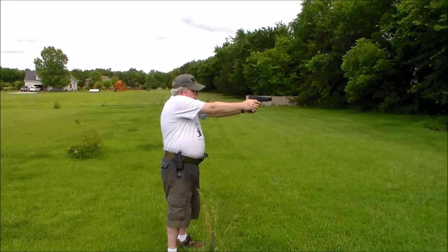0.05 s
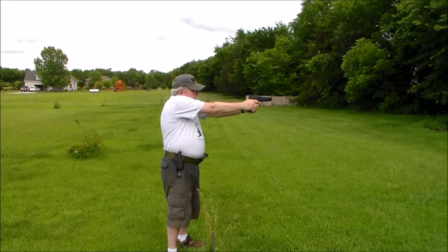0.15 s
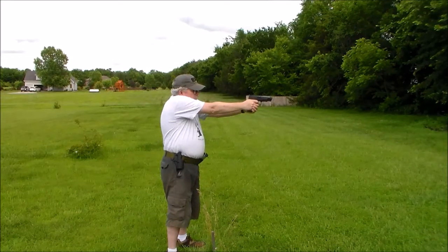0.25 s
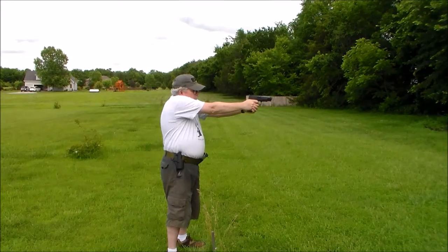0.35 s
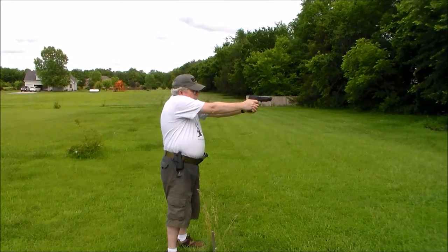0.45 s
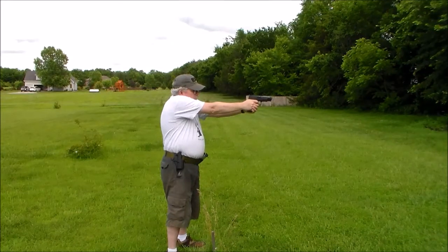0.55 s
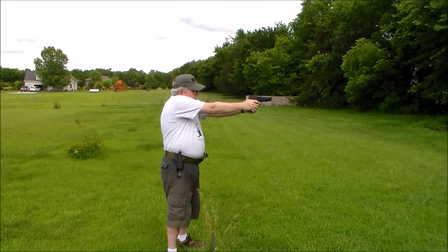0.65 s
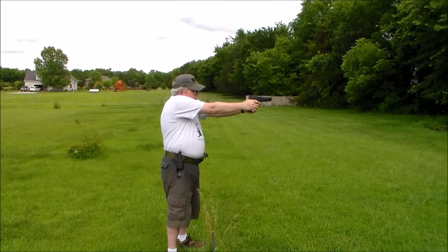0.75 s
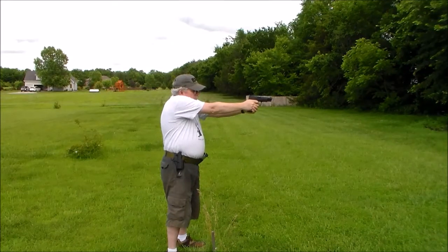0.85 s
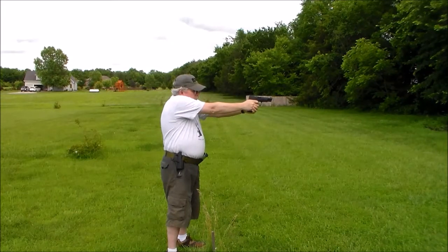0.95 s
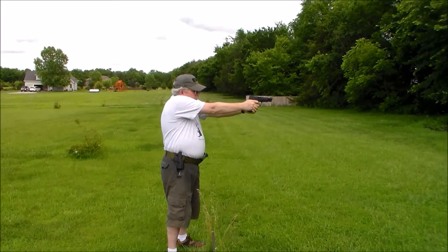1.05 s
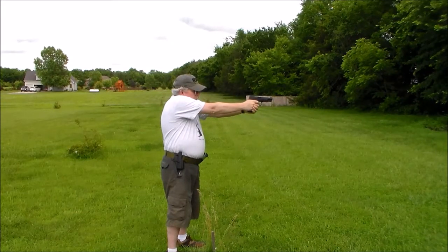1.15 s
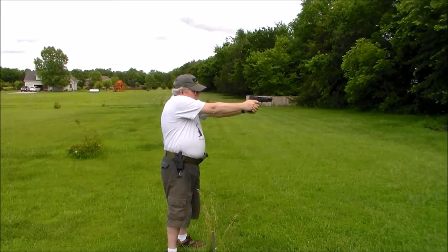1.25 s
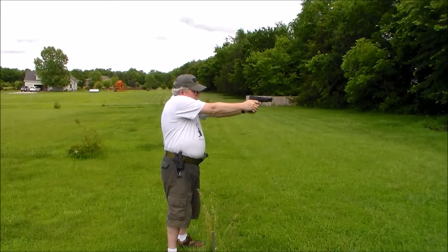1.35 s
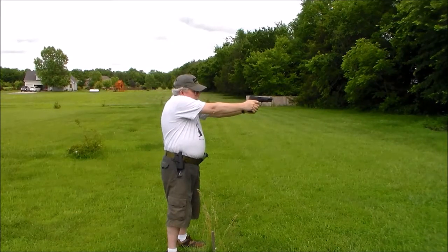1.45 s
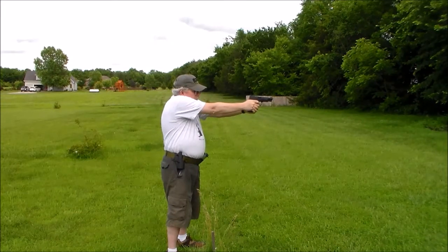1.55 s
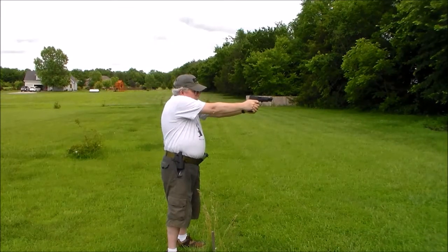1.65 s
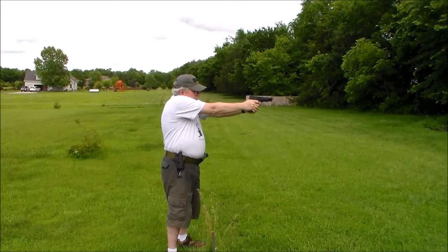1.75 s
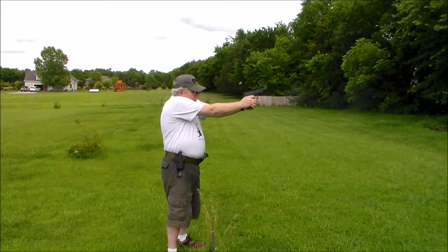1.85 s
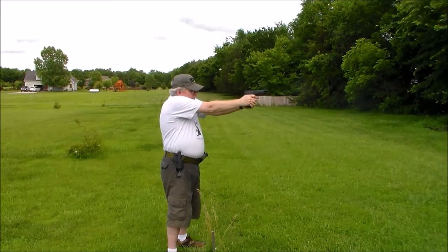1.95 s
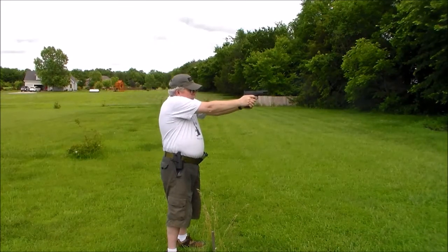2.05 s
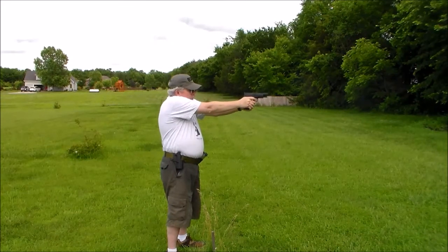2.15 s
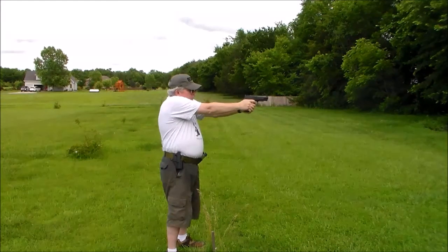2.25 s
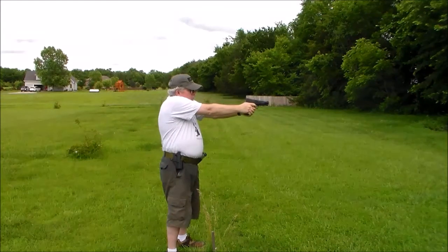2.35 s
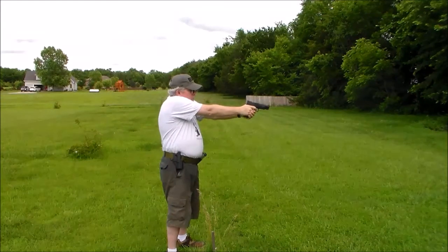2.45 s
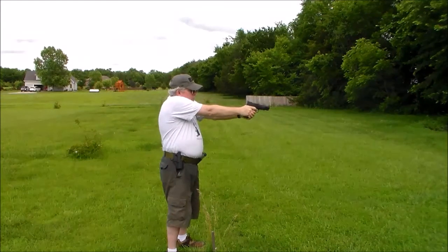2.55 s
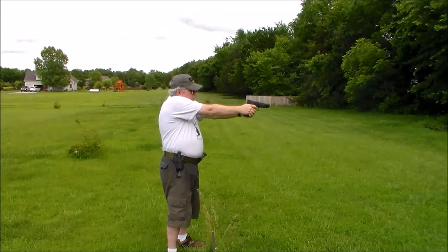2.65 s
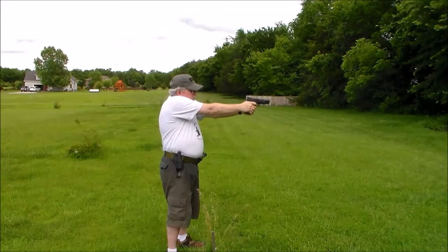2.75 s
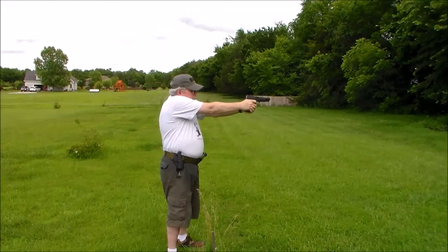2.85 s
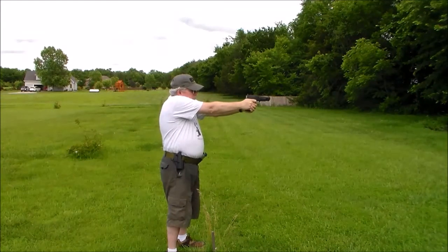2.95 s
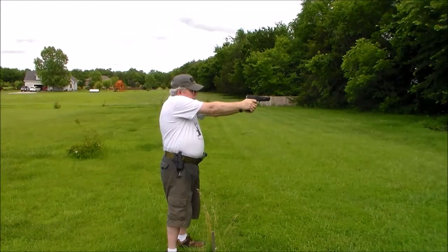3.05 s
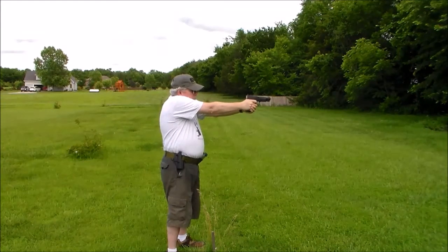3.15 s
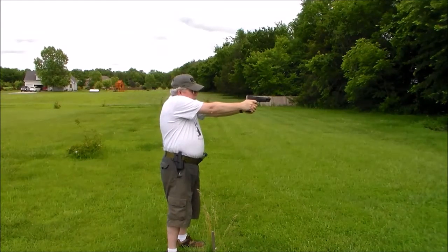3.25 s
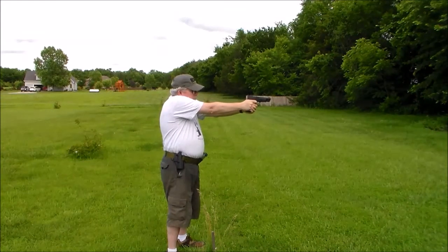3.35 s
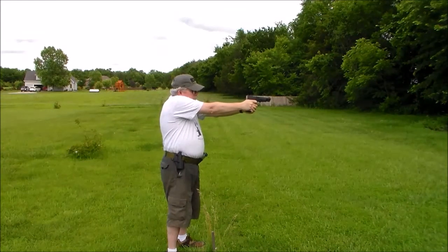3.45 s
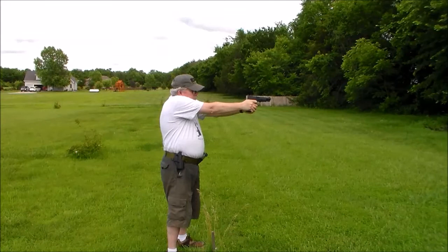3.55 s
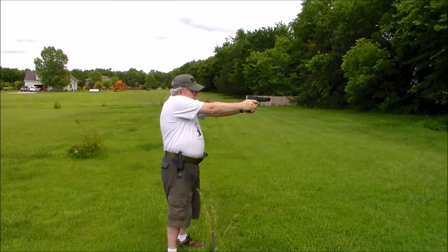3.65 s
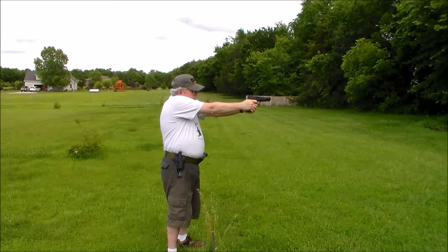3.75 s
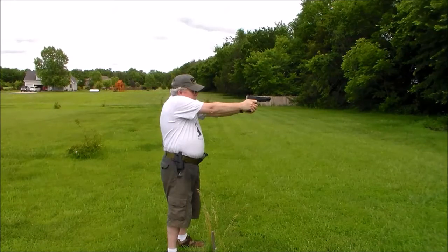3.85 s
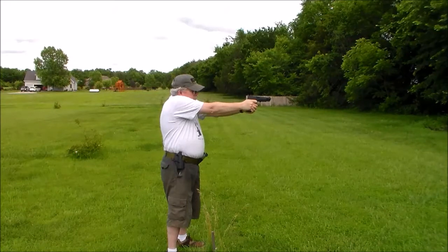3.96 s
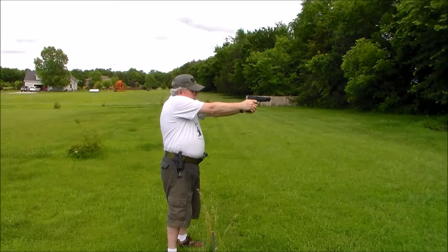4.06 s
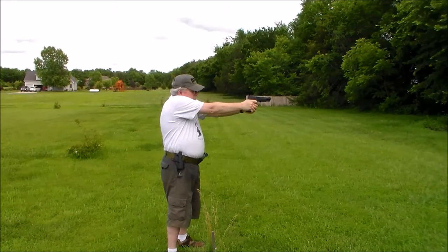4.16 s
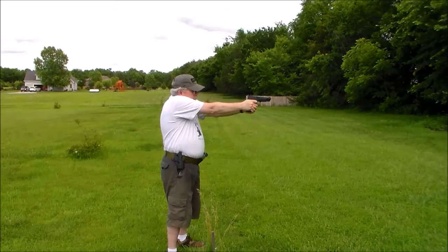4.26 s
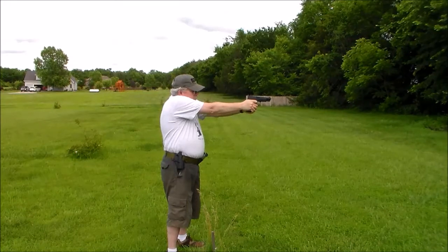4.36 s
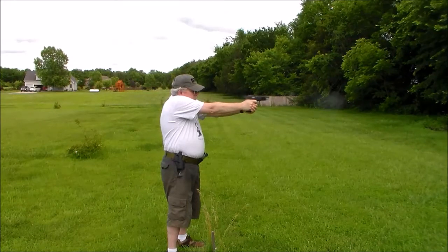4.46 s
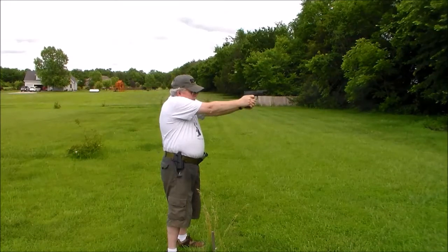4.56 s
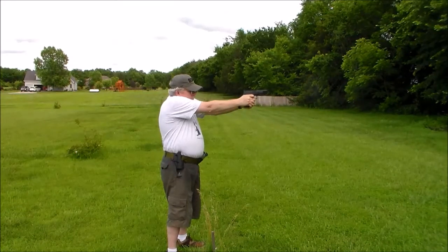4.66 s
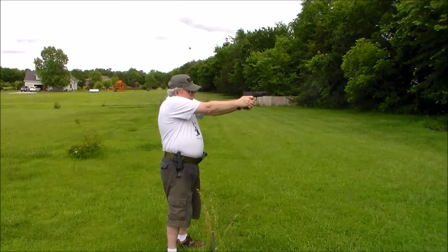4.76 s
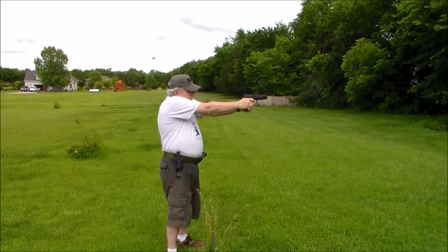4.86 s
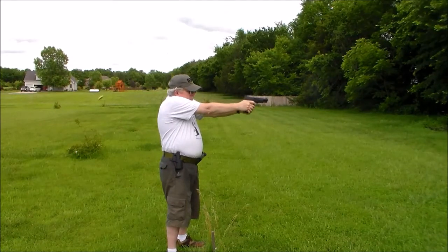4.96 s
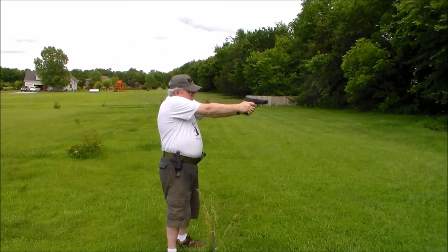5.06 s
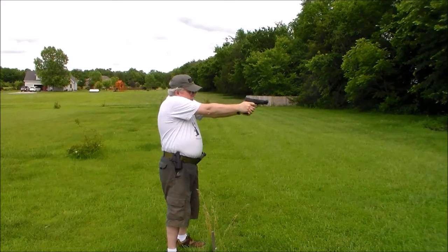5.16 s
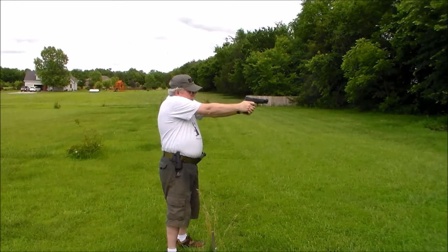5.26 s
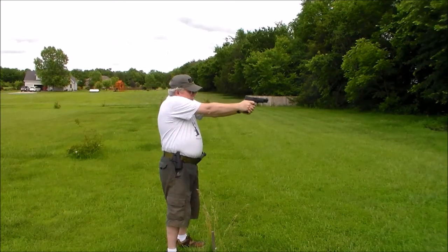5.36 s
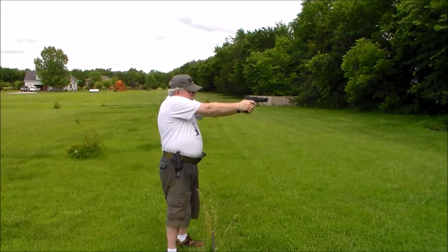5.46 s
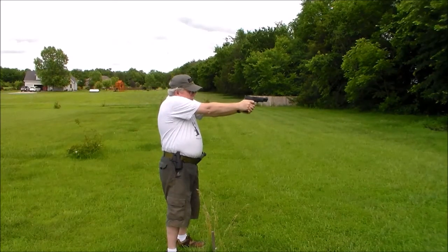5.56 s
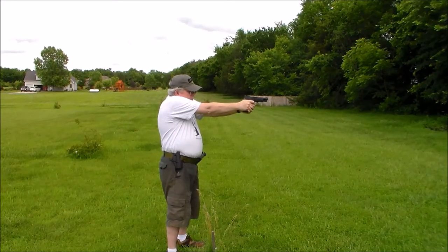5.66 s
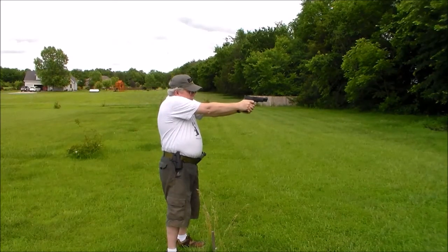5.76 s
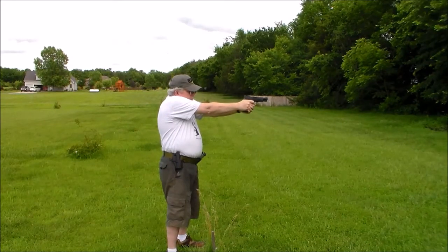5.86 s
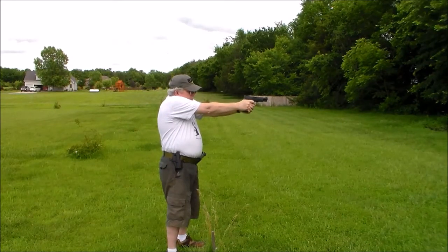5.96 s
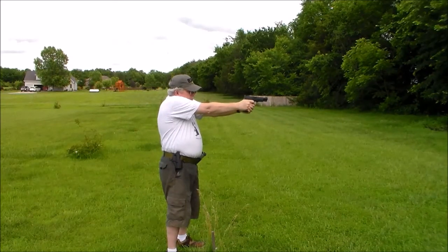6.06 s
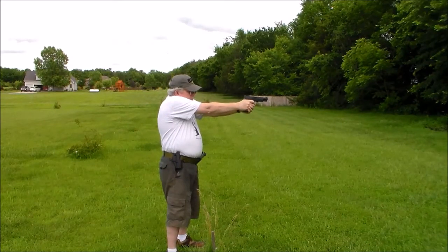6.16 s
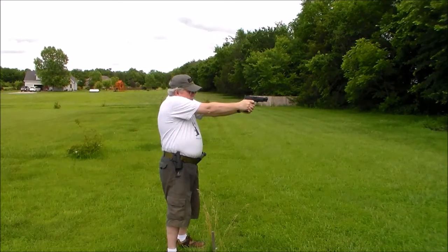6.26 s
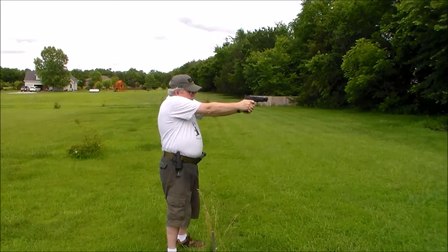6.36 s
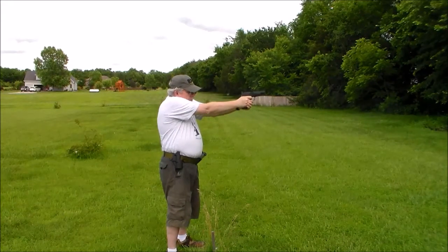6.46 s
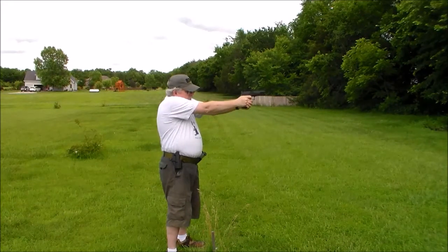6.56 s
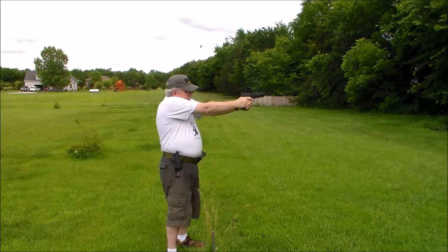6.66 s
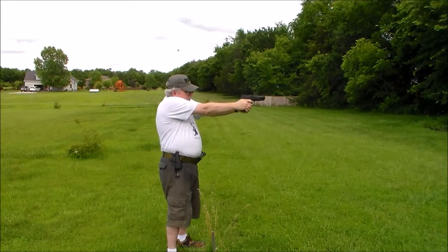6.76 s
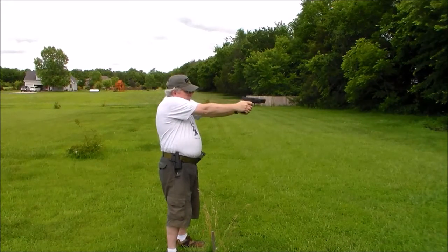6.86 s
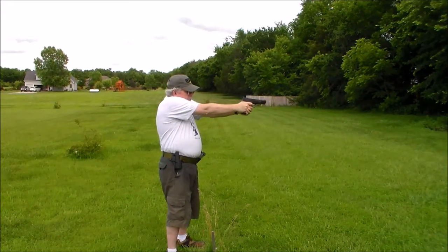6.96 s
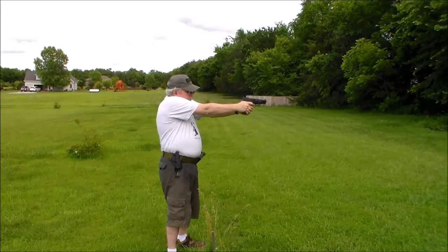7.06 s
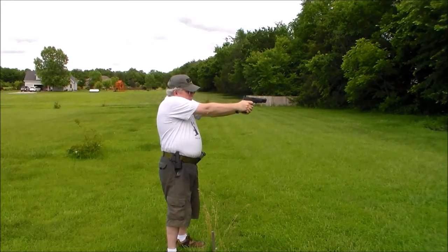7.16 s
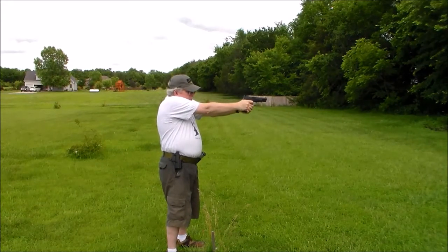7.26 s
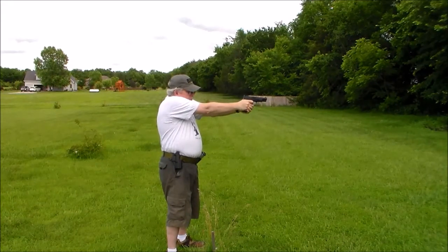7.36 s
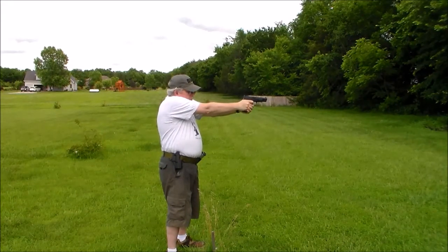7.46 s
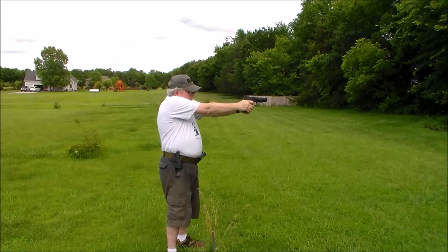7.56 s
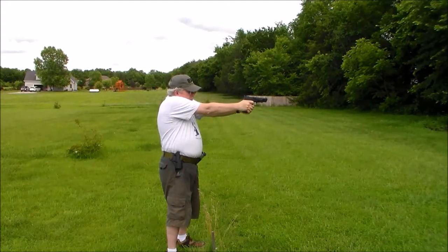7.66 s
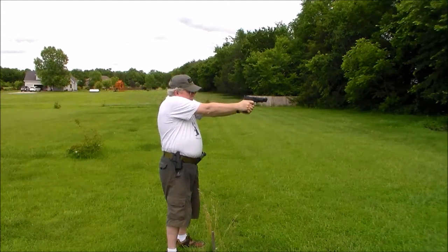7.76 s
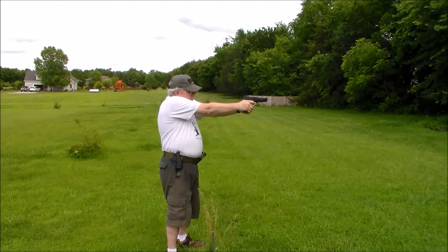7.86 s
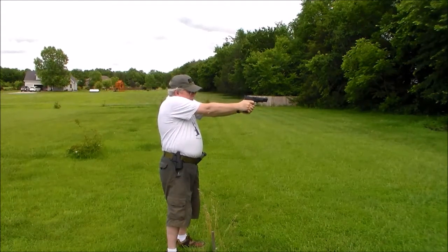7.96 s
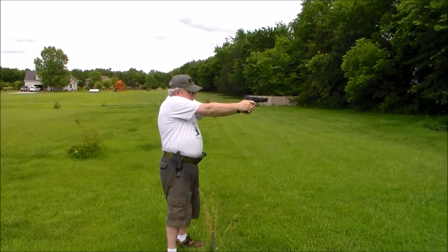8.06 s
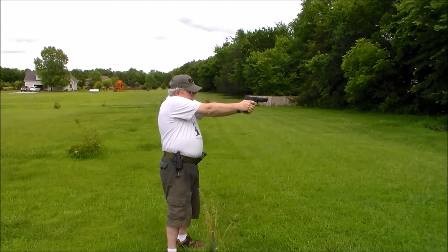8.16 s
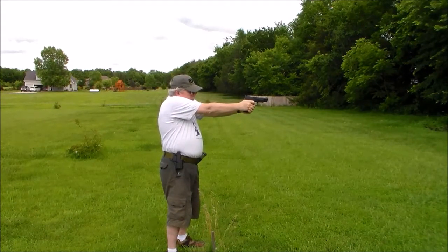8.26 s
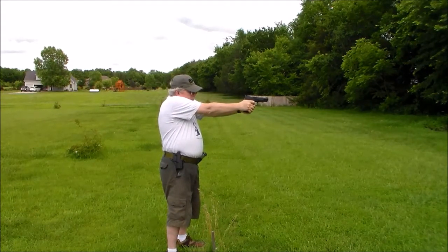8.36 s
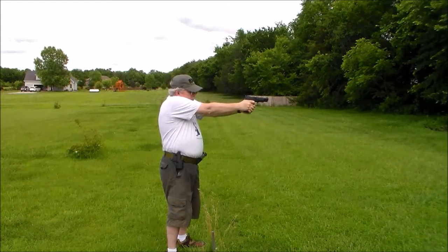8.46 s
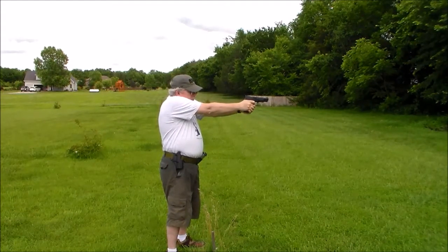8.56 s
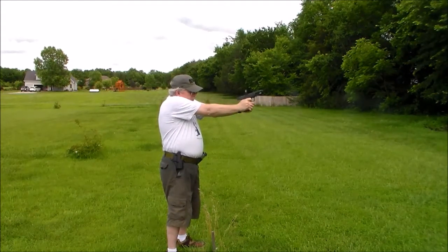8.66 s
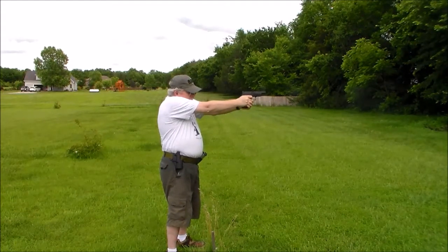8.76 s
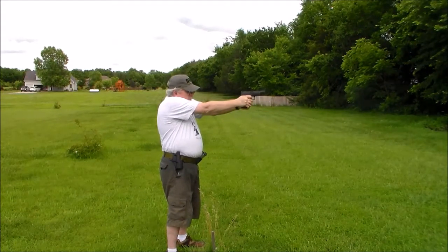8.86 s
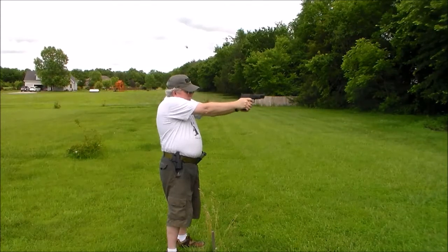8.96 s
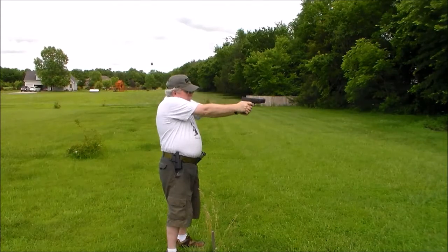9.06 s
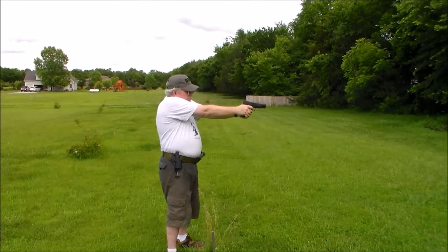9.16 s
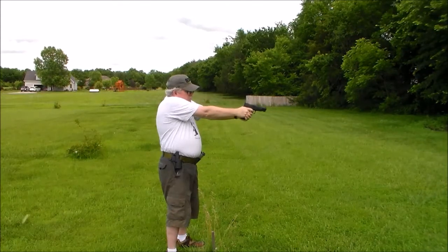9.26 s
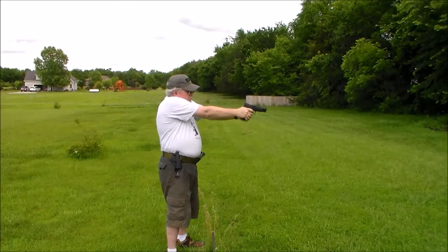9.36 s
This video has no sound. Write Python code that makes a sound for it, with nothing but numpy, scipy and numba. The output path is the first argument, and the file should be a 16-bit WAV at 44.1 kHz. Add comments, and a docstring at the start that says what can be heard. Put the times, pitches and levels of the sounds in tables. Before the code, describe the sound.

Four slow pistol shots crack close by in an open field, each with clattering echoes and a roll, while insects buzz and fall quieter.

```python
"""An insect chorus fills an open field over murmuring air and a far motor: shaped noise and wandering sines.
Four pistol shots break in a few metres away; blast and ground bounce are noise jolts that overload the microphone.
Grass and trees scatter noise, a near wall and far buildings return N-waves, and a long roll of noise fades.
The gain control ducks everything, holds for most of a second, then lets the field swell back."""
import sys
import numpy as np
from scipy import signal
from scipy.fft import rfft, irfft
from scipy.io import wavfile
from scipy.ndimage import uniform_filter1d
from numba import njit

SR = 44100
rng = np.random.default_rng(int(sys.argv[2]) if len(sys.argv) > 2 else 0)


def file_out(sig):
    """Save sig as 16-bit WAV at sys.argv[1]."""
    # one column per channel
    cols = np.atleast_2d(sig).T
    # limit, then scale
    lim = np.clip(cols, -1, 1)
    pcm = np.round(lim * 32767).astype(np.int16)
    wavfile.write(sys.argv[1], SR, pcm)


N = 414540
TOP_HZ = 15500  # upper edge of the sound chain

# The shots, with the bias steps they force on the capsule: start_s, blast_left, blast_right,
# wall_left, wall_right [all four in full scale], roll_db [gain of the long roll],
# carry_db [shifts each echo's level by its own share, up or down]
SHOTS = [(1.9262, -1.5, -1.23, -0.15, -0.22, 2.5, 0.5), (4.599, -1.5, -1.84, -0.19, -0.48, -0.07, 9),
         (6.5273, -2.2, -2.24, -0.15, -.3, -0.5, -5.5), (8.779, -1.43, -0.94, 0.49, -0.07, 0.8, 1.5)]


def undb(db):
    """Turn decibels into an amplitude factor."""
    return 10 ** (np.asarray(db) / 20)


def level(x, db):
    """Scale a sound to an RMS level in dB, both channels together."""
    return x * undb(db) / np.sqrt(np.mean(x ** 2))


def band(x, hz, width):
    """Two-pole resonance, gain 1 at the centre."""
    return signal.lfilter(*signal.iirpeak(hz, hz / width, SR), x)


def steep(x, hz, width):
    """The resonance twice, for dark flanks."""
    return band(band(x, hz, width), hz, width)


def low_pass(x, hz):
    """Third-order roll-off of the treble."""
    return signal.sosfilt(signal.butter(3, hz, fs=SR, output="sos"), x)


def pair(count, alike):
    """Left and right noise with the given likeness, from mid and side."""
    mid, side = rng.standard_normal((2, count))
    alike = np.clip(alike, 0, 1)
    opposite = np.array([[1], [-1]])
    return np.sqrt((1 + alike) / 2) * mid + np.sqrt((1 - alike) / 2) * side * opposite


def colour(x, points):
    """Shape the spectrum of noise by (Hz, dB) points, joined along log frequency."""
    hz, db = np.transpose(points)
    count = x.shape[1]
    bins_hz = np.maximum(np.arange(count // 2 + 1) * SR / count, 1)
    curve_db = np.interp(np.log(bins_hz), np.log(hz), db, -90, -90)
    return irfft(rfft(x) * undb(curve_db), count)


def walk(rate, count):
    """Random levels held 1 / rate s and slewed twice; spread near 1."""
    k = int(SR / rate)
    held = np.repeat(rng.standard_normal(count // k + 1), k)
    return 1.5 * uniform_filter1d(uniform_filter1d(held, k), k)[:count]


def add(out, s, sound):
    """Mix a sound in at a time."""
    i = int(s * SR)
    if i < N:
        out[:, i:i + sound.shape[1]] += sound[:, :N - i]


def lag(x, samples):
    """Delay the left port by a fraction of a sample, as a phase turn."""
    turn = np.exp(-2j * np.pi * np.arange(N // 2 + 1) * samples / N)
    return np.array([irfft(rfft(x[0]) * turn, N), x[1]])


def chorus():
    """Insect level in dB: each shot hushes it part of the way to its quietest, then it slowly picks up."""
    start_db, hushed_db, hush_share = -24.5, -41, 0.5
    hush_s, recover_s = 0.88, 12.1  # time constants
    db = np.full(N, start_db)
    for s, *_ in SHOTS:
        since = np.maximum(np.arange(N) / SR - s, 0)
        drop = hush_share * (db[int(s * SR)] - hushed_db)
        db = db - drop * (1 - np.exp(-since / hush_s)) * np.exp(-since / recover_s)
    return db


def insects(chorus_db):
    """Many insects rasp as flickering noise in a broad treble band, a little to the right."""
    # Spectrum of the chorus: pitch_hz, relative_db [per Hz]
    chorus_spectrum = [(1290, -39), (2200, -39), (2750, -26.5), (3370, -14.5), (4180, -7), (4710, -9),
                       (5910, -1.5), (6340, -3.5), (7420, -19.5), (8000, -23), (10400, -33), (17600, -120)]
    rasp = undb(.9 * walk(9, N) + .9 * walk(120, N))
    lean_db = np.array([[-1.4], [1.4]])
    return level(colour(pair(N, 0.8), chorus_spectrum) * rasp, 0) * undb(chorus_db + lean_db)


def air():
    """The low murmur in the air: dark noise that wavers, rises slightly, then slowly sinks."""
    # Spectrum of the murmur: pitch_hz, relative_db [per Hz]
    murmur_spectrum = [(12, -27.5), (20, -2), (75, -13.5), (108, -6), (150, -7.5), (276, -19), (317, -21),
                       (493, -31.5), (524, -23.5), (679, -27), (1030, -27.5), (1170, -30), (1450, -26.5),
                       (2400, -24), (3120, -66.5), (5280, -120)]
    # Slow level of the murmur: time_s, gain_db
    murmur_level = [(0, 2.5), (3.7, 3.5), (5.2, -2.5), (6.599, -5), (9.4, -6)]
    murmur = level(colour(pair(N, 0.92), murmur_spectrum), -45)
    slow_db = np.interp(np.arange(N) / SR, *np.transpose(murmur_level))
    return murmur * undb(1.2 * walk(6.9, N) + slow_db)


def hiss(chorus_db):
    """High hiss that rises and sinks with the insects, a little further than they do."""
    # Spectrum of the high hiss: pitch_hz, relative_db [per Hz]
    hiss_spectrum = [(4410, -47.5), (7500, -23), (8910, 7.5), (9990, 1.5), (12200, 9.5), (13300, 1),
                     (14300, -14)]
    noise = level(colour(pair(N, 0.17), hiss_spectrum), -52)
    return noise * undb(1.2 * (chorus_db - chorus_db[0]))


def motor():
    """A far motor hums in steady partials of wandering pitch and level; the close pair beats."""
    # Partials of the motor: pitch_hz, wander_hz, level_db [RMS, before the gain control]
    partials = [(53.6, 1.5, -55), (100.4, .6, -52), (107, .6, -48.5), (137.3, 1.3, -55),
                (160.7, 2.3, -55.5), (215, 3.5, -58), (315, 4, -66), (1003, 5.4, -66.5), (1480, 8, -65)]
    hum = np.zeros(N)
    for hz, wander_hz, db in partials:
        phase = 2 * np.pi * np.cumsum(hz + wander_hz * walk(6, N)) / SR
        hum += level(np.sin(phase) * undb(1.7 * walk(2.8, N)), db)
    return hum


def field():
    """Insects and a high hiss stand over the murmuring air and a far motor."""
    chorus_db = chorus()
    return insects(chorus_db) + air() + hiss(chorus_db) + motor()


def burst(length_ms, db, hz, width):
    """A ragged pressure jolt that rings the microphone housing."""
    jolt = pair(600, 0.82) * (np.arange(600) < length_ms * SR / 1000)
    ring = band(jolt, hz, width)
    return ring * undb(db) / np.max(np.abs(ring))


def grass():
    """Treble scattered right after the blast, each band dying at its own pace."""
    # Bands of the scattered treble: pitch_hz, level_db [RMS before its decay], t60_s
    blades = [(4380, 3.5, 0.2), (7450, -1.5, 0.52), (10900, -7, 0.29)]
    t = np.arange(SR) / SR
    noise = pair(SR, .7) * (t > .004)
    return sum(level(steep(noise, hz, hz), db) * undb(-60 * t / t60) for hz, db, t60 in blades)


def trees(scatter):
    """Many small reflectors: grass fades at once, then the tree line answers, sags and dies band by band."""
    # Bands of the return: pitch_hz, relative_db, t60_s [after the sag]
    foliage = [(121, -2.5, 0.33), (250, 1.5, 0.46), (530, 12.5, 0.22), (820, 11.5, 0.6), (1385, 10.5, 0.21),
               (2380, 6.5, 0.32), (2980, 1, 0.54), (4700, -14, 0.24)]
    grass_s, grass_db, grass_t60_s = .004, 1.5, 0.14
    trees_s, rise_s, trees_db = 0.044, .01, -3
    sag_db_per_s, sag_end_s = 90, 0.12  # the sag ends here, then each band dies
    t = np.arange(scatter.shape[1]) / SR
    late = np.maximum(t - sag_end_s, 0)
    bands = np.zeros_like(scatter)
    for hz, db, t60 in foliage:
        bands += level(steep(scatter, hz, 1.37 * hz), db) * undb(-60 * late / t60)
    bands = low_pass(bands, 5670)
    near = (t > grass_s) * undb(grass_db - 60 * (t - grass_s) / grass_t60_s)
    rise = np.clip((t - trees_s) / rise_s, 0, 1)
    line = rise * undb(trees_db - sag_db_per_s * (t - late - trees_s))
    return bands * np.hypot(near, line)


def echo(db, hz, width, air_hz):
    """The N-shaped blast wave sent back by one surface, smeared by its roughness."""
    t = np.arange(900) / SR
    n_wave = (1 - 2 * t * hz) * (t < 1 / hz)
    smear = .55 * pair(len(t), .6) * np.exp(-t / .0024)
    ring = low_pass(steep(n_wave + smear, hz, width), air_hz)
    return -ring * undb(db) / np.max(np.abs(ring))


def echoes(carry_db):
    """Single reflectors, the wall first; the air takes more treble from the later ones."""
    # Reflectors: delay_s [after the shot], pitch_hz, width_hz, peak_db [at a carry of 0 dB],
    # carry_share [dB of shift per dB of the shot's carry; negative turns it around]
    reflectors = [(0.0517, 2220, 750, 34.5, -0.49), (0.051, 4680, 5860, 23.5, 0),
                  (.061, 3050, 2470, 13.5, 0), (0.072, 3060, 2960, 22.5, -0.51),
                  (0.0792, 2320, 2400, 22.5, 0.029), (.09, 1204, 2490, 26, 0.04),
                  (.12, 1400, 2500, 14, -0.19), (.129, 2480, 3500, -3, 0.35),
                  (0.541, 2530, 2000, -24, 0.071), (.645, 2600, 1500, -13, .1),
                  (.697, 2800, 1400, -12, .95), (0.7029, 2840, 920, -6.5, 0.95),
                  (0.7938, 2220, 3850, 1.5, 0.31), (0.8502, 2030, 2800, -0.5, 0.0019),
                  (.875, 1900, 1500, -5.5, .2), (.883, 3200, 3000, -15, -0.61),
                  (0.912, 2180, 2400, -20, -.3), (0.929, 2050, 1800, -24, 0.027),
                  (.937, 1980, 1500, -13, -.3), (1.583, 2300, 1800, -41, 1.3),
                  (1.62, 2040, 1300, -26, -0.37), (1.64, 2270, 1500, -25.5, -0.24),
                  (1.815, 1800, 1200, -33, -.1)]
    edge_hz, edge_at_s, edge_slope = 9500, .1, .27  # treble edge at that delay, sinking as a power of it
    returns = np.zeros((2, 2 * SR))
    for delay, hz, width, db, share in reflectors:
        air_hz = min(edge_hz * (edge_at_s / delay) ** edge_slope, TOP_HZ)
        add(returns, delay, echo(db + share * carry_db, hz, width, air_hz))
    return returns


def roll():
    """Long roll: dull rumble and a thinner bright wash, a few washes from far fields."""
    # Washes: delay_s [after the shot], dull_db, bright_db [both before the shot's roll gain], t60_s
    washes = [(0.098, 6.5, 4.5, 0.42), (0.101, -15.5, -23, 2.19), (0.099, -37, -62, 14.6),
              (0.662, -36, -27, 1.31), (.745, -26, -30.5, .3), (.86, -45, -30, 0.78),
              (1.5, -51.5, -45, 3.3)]
    rise_s = 0.024
    count = int(3.5 * SR)
    s, dull_db, bright_db, t60 = np.transpose(washes)[:, :, None]
    since = np.maximum(np.arange(count) / SR - s, 0)
    wash = np.minimum(since / rise_s, 1) * undb(-60 * since / t60)
    dull = level(steep(pair(count, 0.93), 721, 720), 0) * undb(1.3 * walk(25, count))
    bright = level(steep(pair(count, .8), 2100, 2400), 0) * undb(2.5 * walk(150, count))
    # the washes add up in power
    dull_gain = np.linalg.norm(wash * undb(dull_db), axis=0)
    bright_gain = np.linalg.norm(wash * undb(bright_db), axis=0)
    return dull * dull_gain + bright * bright_gain


def shots():
    """Each shot meets the same reflectors, but the air stirs the fine pattern."""
    # Blast and its ground bounce: delay_s [after the shot], length_ms, peak_db, pitch_hz, width_hz
    jolts = [(0, 1.3, 45, 3380, 2990), (.0026, 1.8, 46, 3200, 2920)]
    out = np.zeros((2, N))
    trunks = undb(3 * walk(450, SR))  # spiky pattern shared by all shots
    same = pair(SR, 0.9)
    for s, *_, roll_db, carry_db in SHOTS:
        for delay, *jolt in jolts:
            add(out, s + delay, burst(*jolt))
        stirred = 0.67 * same + 0.71 * pair(SR, 1.0)
        add(out, s, trees(trunks * stirred) + grass())
        add(out, s, echoes(carry_db))
        add(out, s, roll() * undb(roll_db))
    return out


def scene():
    """The field with the shots in it, each reaching the left port a little late."""
    # Lag of the left port: shots_samples, field_samples
    shots_lag, field_lag = .7, 1.5
    return lag(field(), field_lag) + lag(shots(), shots_lag)


@njit
def duck(power, top_db, most_db, smooth, attack, release, hold, pause, linger, settle):
    """Gain in dB: drops fast, waits long after overload and briefly after a jolt, climbs, ends slowly."""
    gain = np.empty(len(power))
    fast, slow = 0., 0.
    energy, wait, armed = 1e-9, 0., True
    for i in range(len(power)):
        energy += smooth * (power[i] - energy)
        want = min(0., top_db - 10 * np.log10(energy))
        if want < 1.5 * most_db and armed:  # overload
            wait, armed = hold, False
        want = max(want, most_db)
        if want < fast - 4:  # jolt
            wait = max(wait, pause)
        wait -= 1
        if want < fast:
            fast += attack * (want - fast)
        elif wait <= 0:
            fast += release * (want - fast)
            armed = True
        slow = min(slow * (1 - settle), linger * fast)
        gain[i] = min(fast, slow)
    return gain


def offset():
    """Overload shifts the capsule's bias; three coupling capacitors pull it back in a slow swing."""
    blast_s, wall_s, coupling_s = .0012, .053, 0.076  # two delays after the shot, one time constant
    steps = np.zeros((2, N))
    for s, left, right, wall_left, wall_right, *_ in SHOTS:
        steps[:, int((s + blast_s) * SR):] += [[left], [right]]
        steps[:, int((s + wall_s) * SR):] += [[wall_left], [wall_right]]
    steps = uniform_filter1d(steps, size=40)
    for _ in range(3):
        steps = signal.lfilter(*signal.butter(1, 1 / (2 * np.pi * coupling_s), "high", fs=SR), steps)
    return steps


def circuits():
    """Faint rumble and hiss of the microphone's own circuits, untouched by the gain control."""
    low_rumble = level(steep(pair(N, 1.0), 45, 130), -61)
    faint_hiss = level(steep(pair(N, 0.24), 5000, 7000), -71)
    return low_rumble + faint_hiss


def record(dry):
    """Capsule roll-off, gain control, circuit noise, bias swing, hard clipping, cut top."""
    dry = signal.sosfilt(signal.ellip(6, .2, 50, 14200, fs=SR, output="sos"), dry)
    power = np.mean(dry ** 2, axis=0) + 1e-12
    # seconds turned into samples, or into a share per sample
    down = dict(smooth=1 / (.004 * SR), attack=1 / (.002 * SR), hold=.691 * SR)
    back = dict(pause=0.079 * SR, release=1 / (0.026 * SR), linger=0.56, settle=1 / (.3 * SR))
    gain_db = duck(power, top_db=-26.5, most_db=-26.5, **down, **back)
    clipped = np.clip(dry * undb(gain_db) + circuits() + offset(), -1, 1)
    return signal.sosfilt(signal.ellip(8, .2, 70, TOP_HZ, fs=SR, output="sos"), clipped)


dry = scene()
out = record(dry)
file_out(out)
```